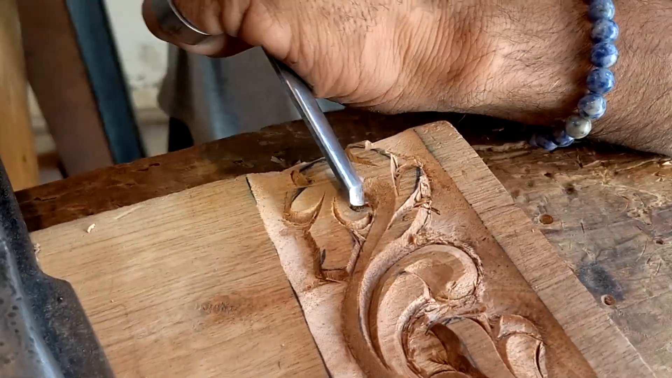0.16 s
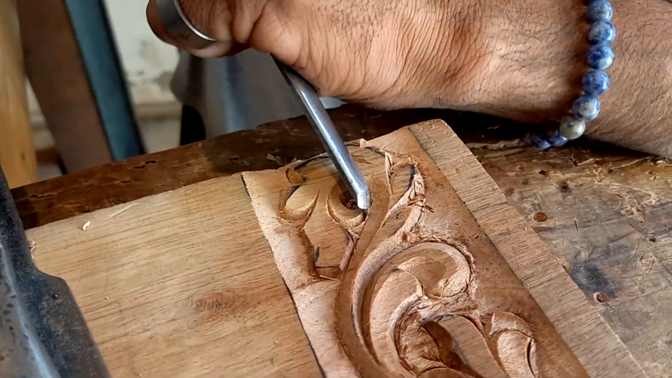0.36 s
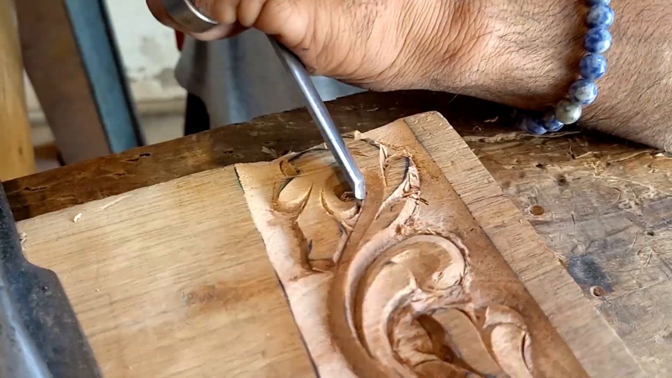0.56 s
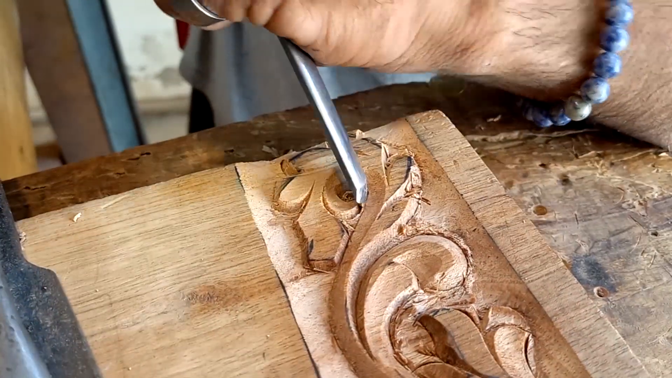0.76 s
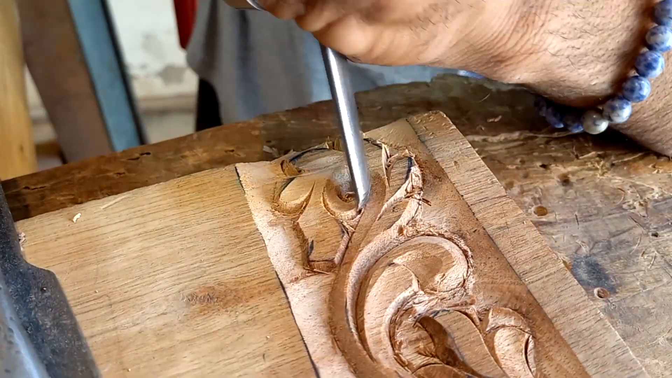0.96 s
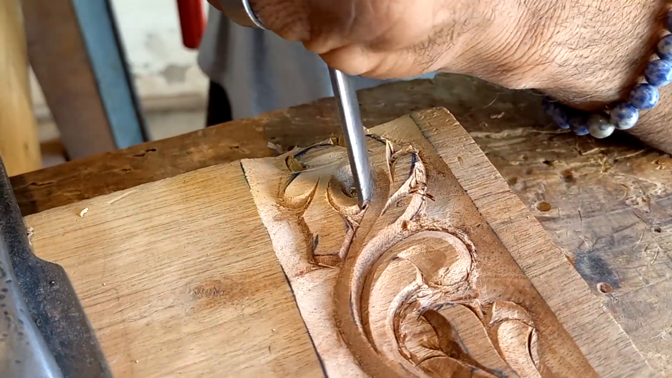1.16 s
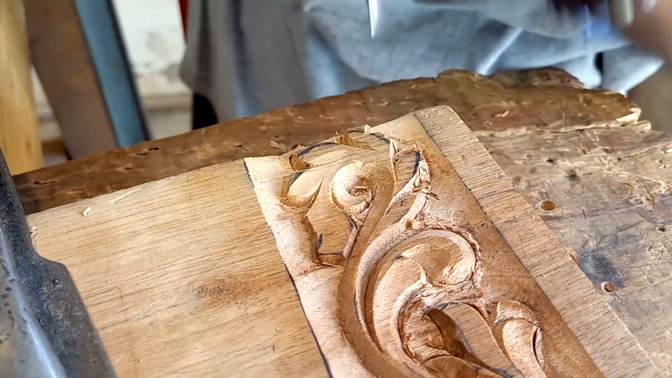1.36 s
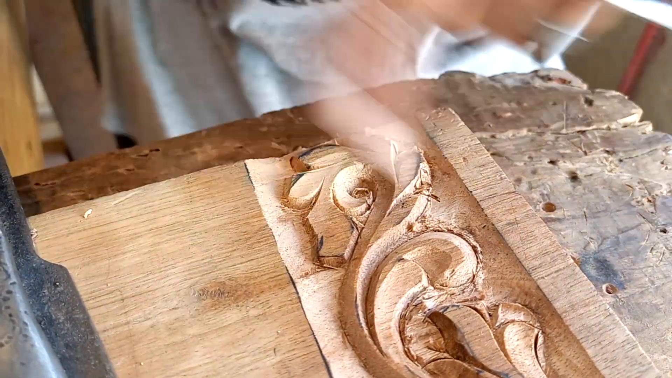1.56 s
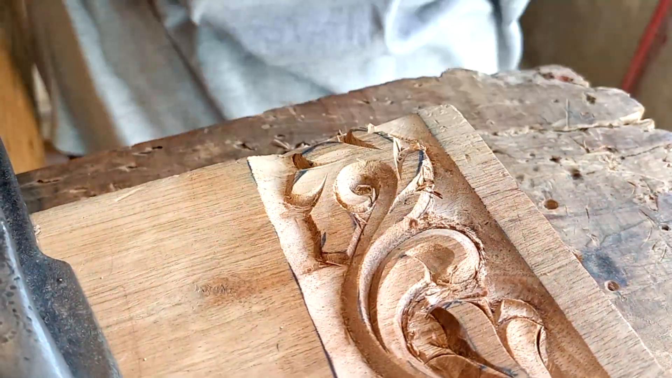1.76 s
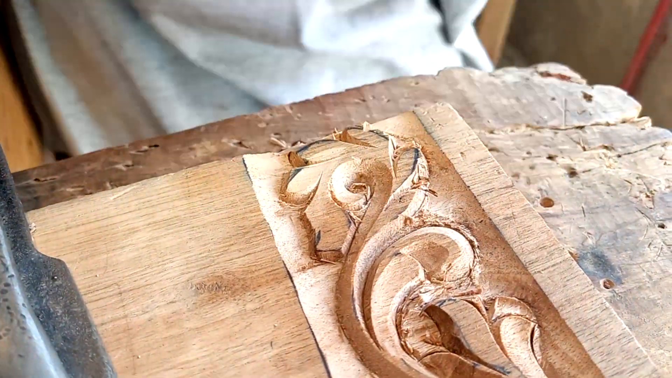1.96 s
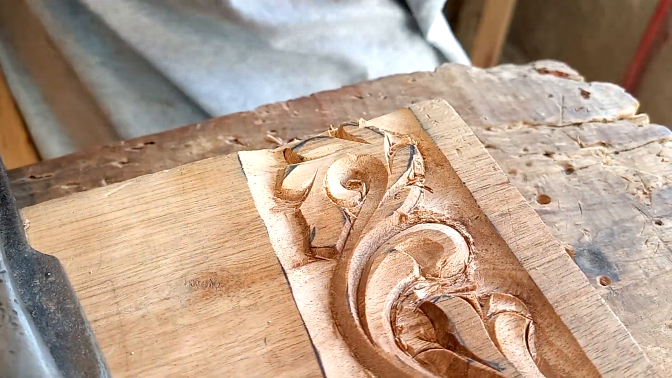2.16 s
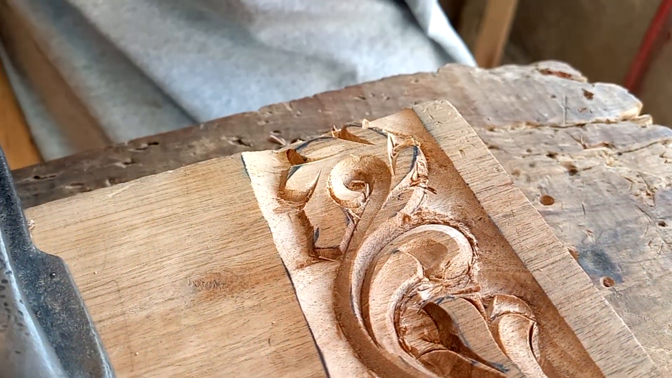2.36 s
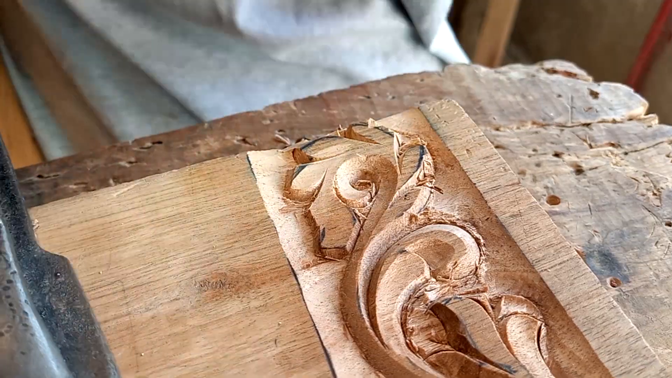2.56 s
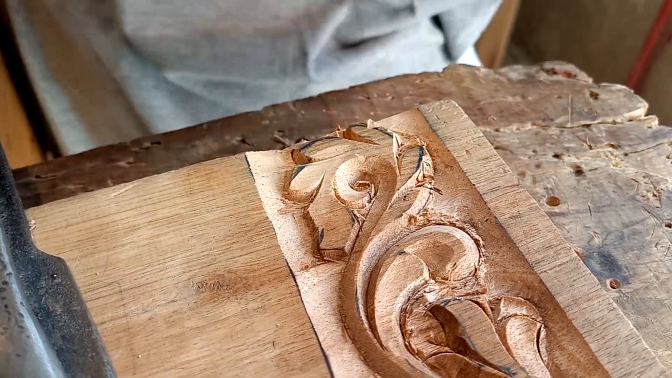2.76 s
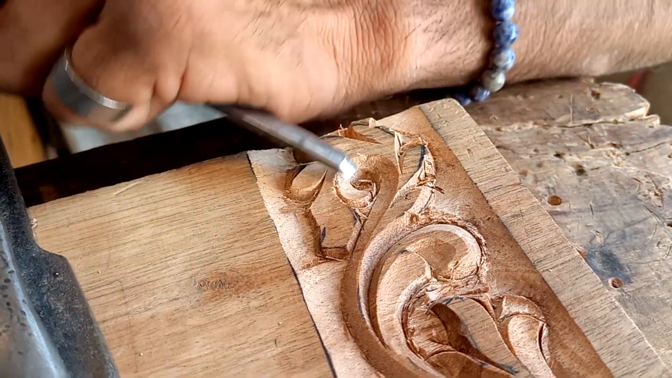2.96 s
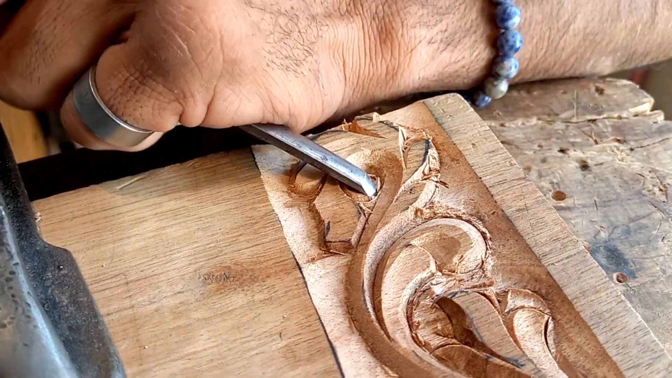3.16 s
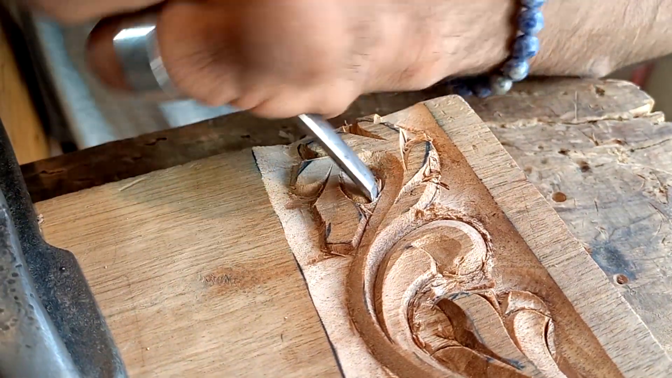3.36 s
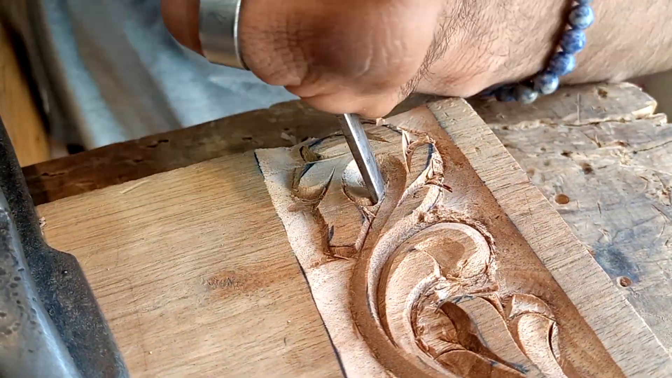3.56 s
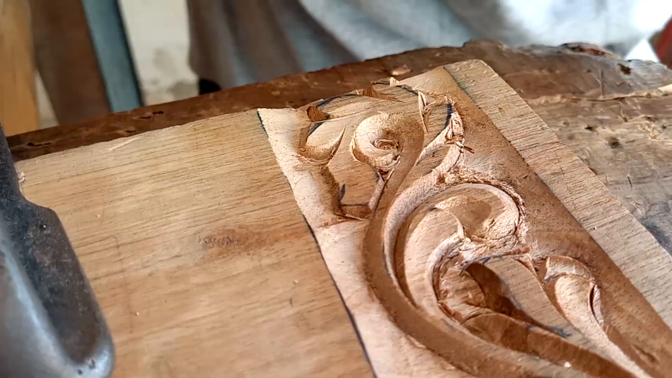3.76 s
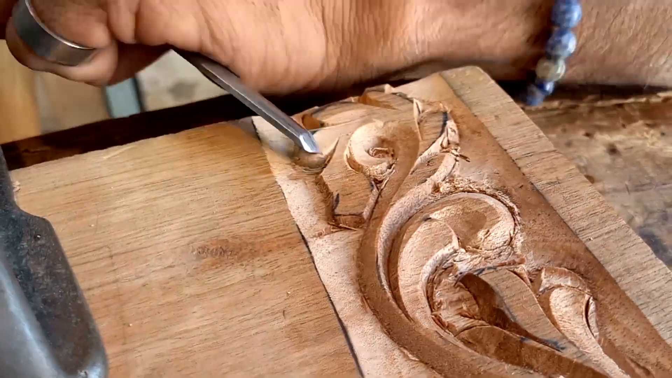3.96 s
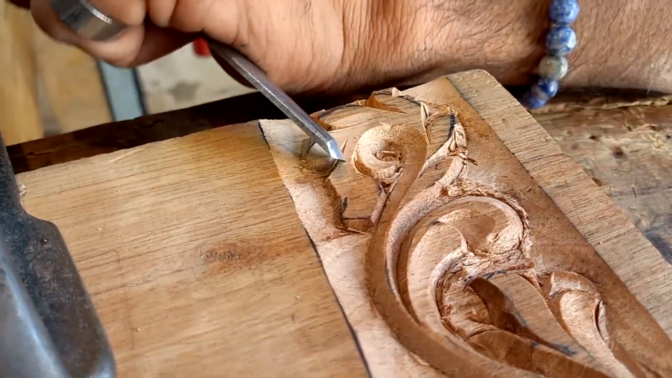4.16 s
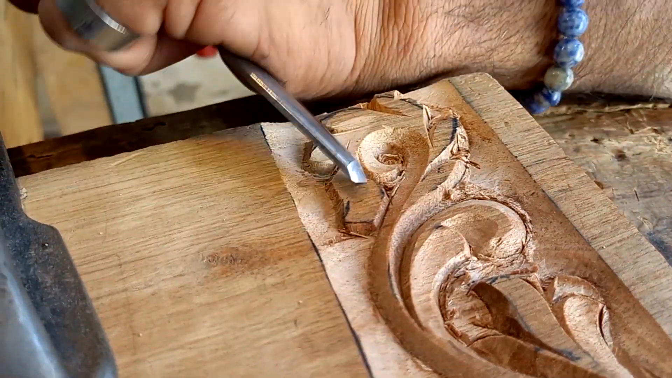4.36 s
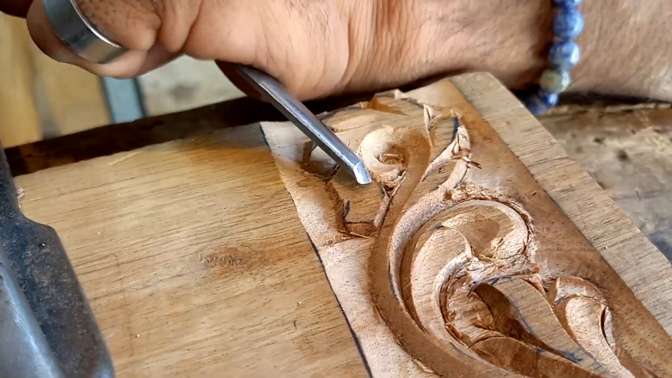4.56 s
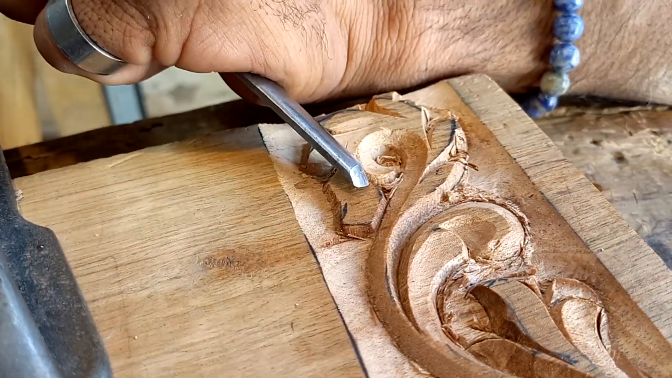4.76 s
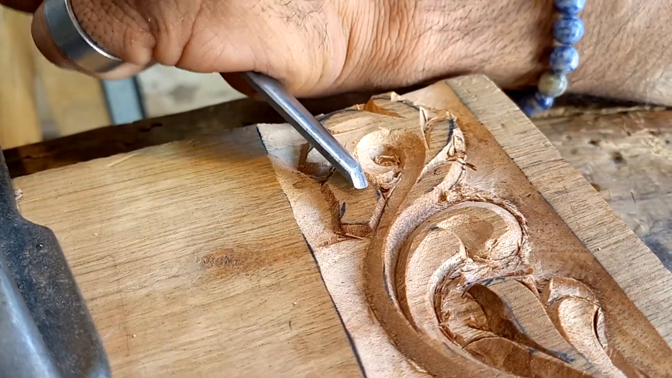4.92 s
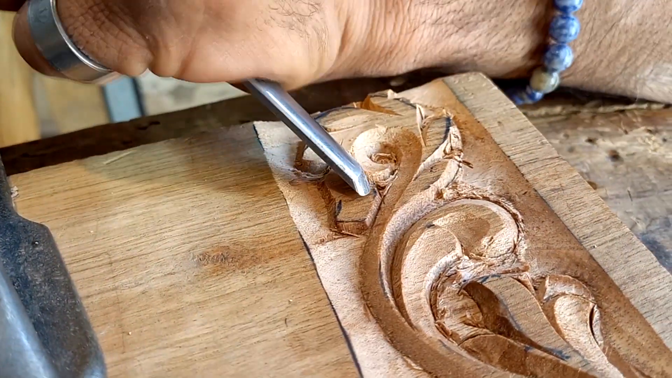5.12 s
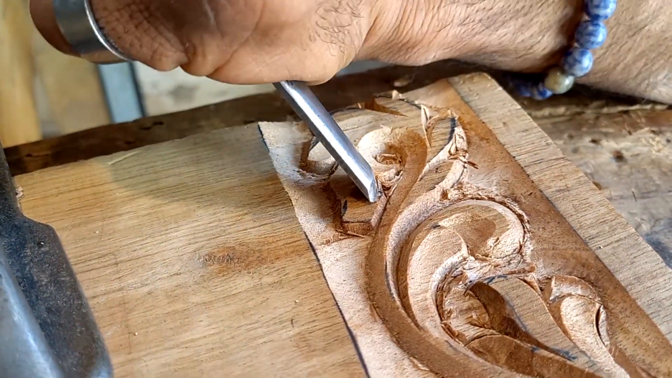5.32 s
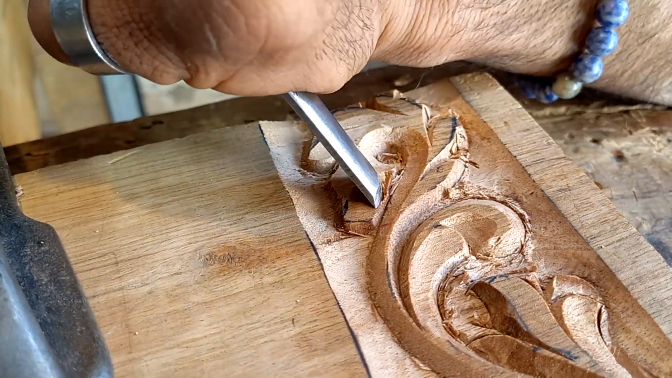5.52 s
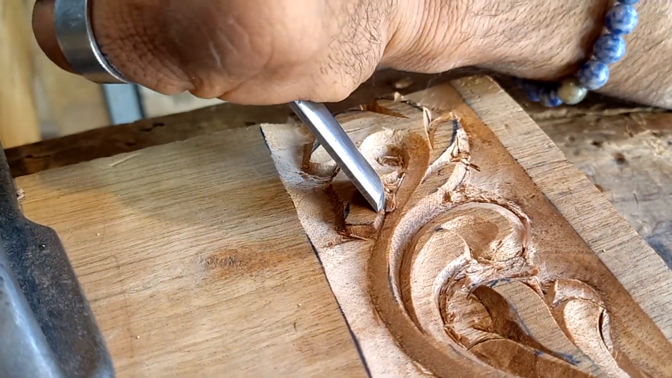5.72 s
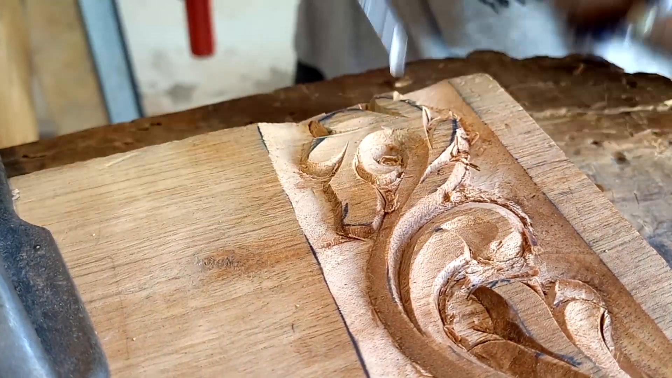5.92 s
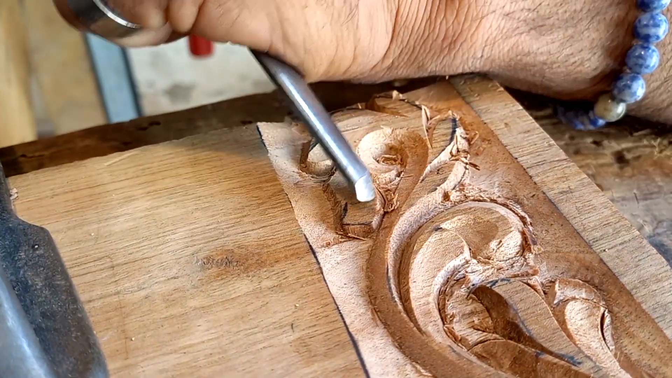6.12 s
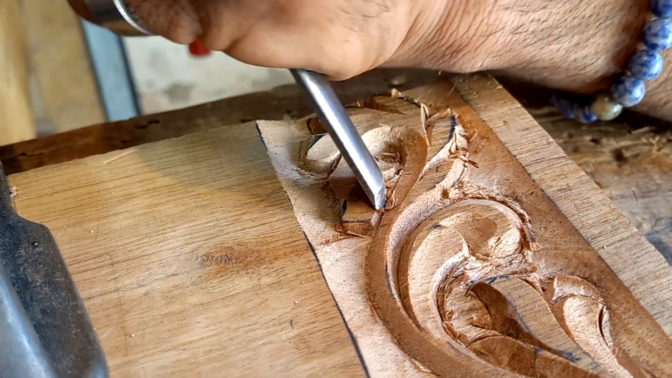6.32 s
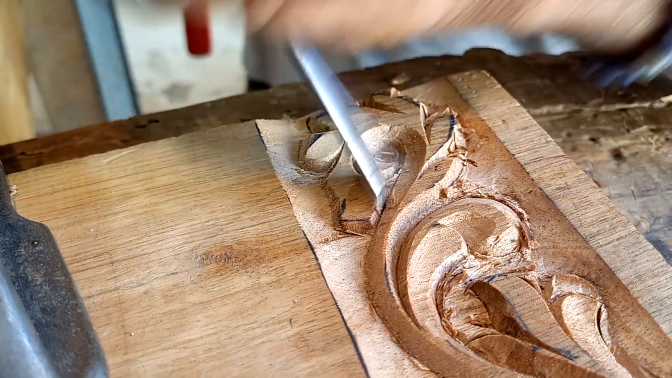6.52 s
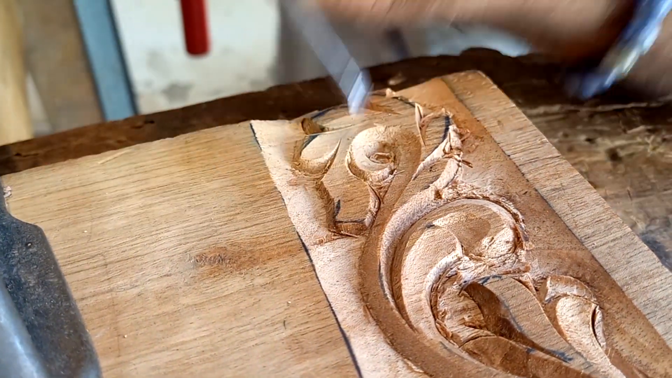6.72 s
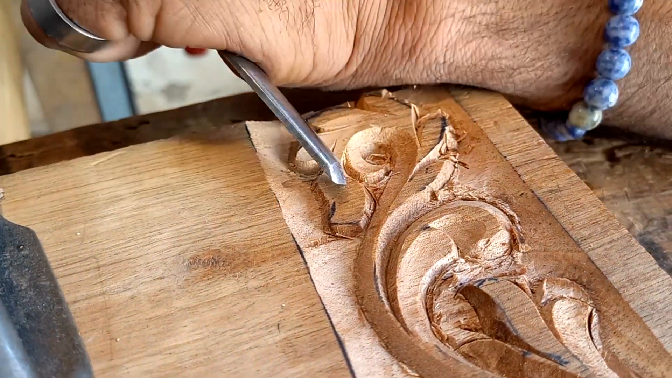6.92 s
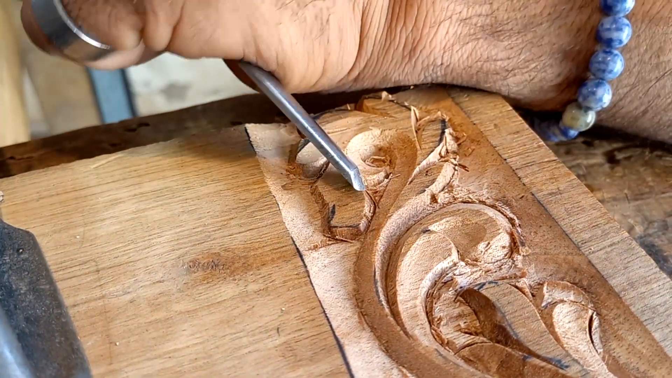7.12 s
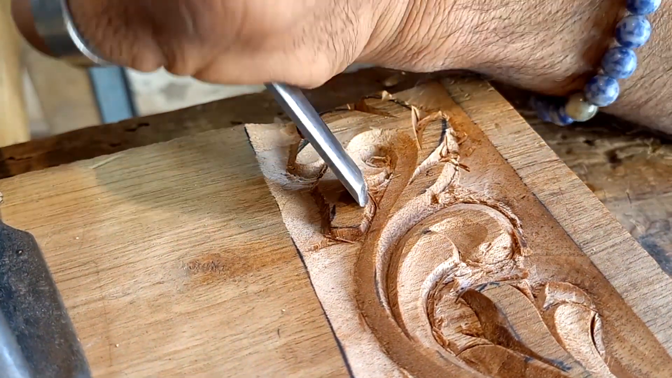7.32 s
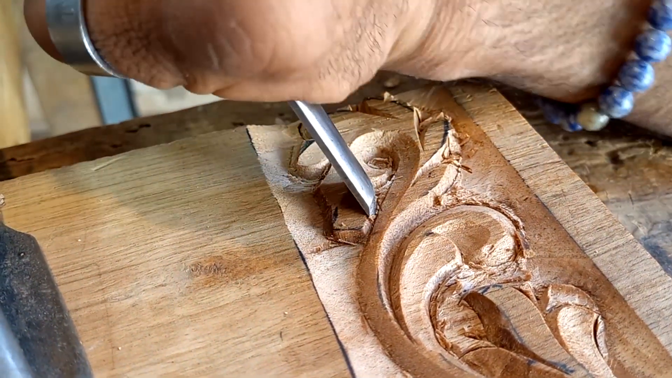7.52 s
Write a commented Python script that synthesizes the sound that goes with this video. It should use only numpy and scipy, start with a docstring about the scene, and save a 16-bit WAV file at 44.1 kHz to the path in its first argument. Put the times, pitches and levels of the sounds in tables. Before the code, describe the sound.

Close stereo microphones catch dry, cracking wood knocks with a thick bench thump swelling just behind each attack. Three come early, then a steel tool clacks down with quick dying bounces and light handling bumps. A pair, a steady run of seven rising in force, and two more pairs follow. Small room, very short reverberation, low drone fading early, quiet hiss of hand and blade brushing wood.

```python
"""A small room with a workbench: a steel gouge is driven into a hardwood panel in five short runs of knocks.
Each knock is a push, ringing modes and noise for the crack, a slower swell of bench and room, and loose steel
set ringing on the bench. A gouge drops and rocks to rest in dying bounces; steel ticks as filtered clicks, and
brushing over the carving is swelling noise. Below lie still-room noise and a far drone of noise and wavering
hum that fades. A fast limiter squashes the attacks."""
import sys
import numpy as np
from scipy import signal
from scipy.fft import rfft, irfft
from scipy.io import wavfile
from scipy.ndimage import uniform_filter1d, minimum_filter1d

SR = 44100
rng = np.random.default_rng(int(sys.argv[2]) if len(sys.argv) > 2 else 0)


def wav_record(signal):
    """Record a signal, one row per channel, as 16-bit PCM in the file named by sys.argv[1]."""
    frames = np.transpose(np.atleast_2d(signal))
    bounded = np.clip(frames, -1, 1)
    # unit amplitude maps onto the largest positive 16-bit level
    quanta = np.round(bounded * 32767).astype(np.int16)
    wavfile.write(sys.argv[1], SR, quanta)


N = 334278
T = np.arange(round(.45 * SR)) / SR  # clock of one blow, seconds

# Knocks on the gouge, the last of each run the heaviest. Each row: start in seconds, force in dB,
# bass weight in dB, treble snap in dB, pitch of the cut in Hz, crack in dB.
KNOCK_ROWS = [(0.8414, -13.5, -0.5, 0, 2880, 10), (0.995, -8, 3.5, -2.5, 3380, 3.5),
              (1.136, -11, 7, 2, 610, -6), (3.4729, -8, 1.5, 0.5, 1460, 6.5), (3.609, -15, 10, 8, 640, 3.5),
              (4.501, -26.5, -3.5, -14, 800, -1), (4.6428, -19, -3, -0.5, 755, 4),
              (4.8162, -15, -4, -6, 740, 7.5), (4.981, -13.5, 0.5, -14, 1500, 12.5),
              (5.1392, -14, -4, -4, 810, 4), (5.2917, -10, 0.5, -8.5, 3120, -3.5),
              (5.4332, -10.5, 4.5, -6, 764, -6), (6.1275, -10, -2, -7, 1410, 1.5),
              (6.258, -9.5, 5.5, -4, 790, -9.5), (7.0755, -15.5, 1, -10, 2930, 3),
              (7.2204, -8, 6, -5, 1421, 10.5)]
# Place of the crack, moving from right to left. Each row: time in seconds, left minus right in dB.
KNOCK_PAN = [(0.8, -2), (4.5, 6), (7.5, 5)]
# Modes of gouge and handle. Each row: pitch in Hz, relative level in dB, time to fall 60 dB in seconds.
# Here and in the bench and steel tables the pitches are those of the early runs.
GOUGE_MODES = [(763, -12, 0.023), (987, -19, .03), (1415, -1.5, 0.025), (1620, 1.5, 0.022),
               (2220, 1, 0.015), (2957, -5.5, 0.025), (4200, -15, 0.0043)]
# Modes of bench top and panel. Each row: pitch in Hz, relative level in dB, time to fall 60 dB in seconds.
BENCH_MODES = [(126.44, -21.5, 0.49), (147, -21.5, .33), (201.8, -12.5, 0.33), (236.4, -21, 0.37),
               (309.4, -21.5, 0.34), (376, -6.5, 0.17), (434.7, -20, 0.22), (457, -8.5, .25),
               (499.7, -10, 0.24), (591, -19.5, 0.15), (714, -15, 0.19), (864, -21, 0.053),
               (1235, -14.5, 0.16), (1542, -20, 0.27), (1860, -27.5, 0.21), (2290, -29.5, 0.24),
               (2340, -30.5, 0.16), (2834, -29, 0.14)]
# Dense splintering crack at the edge. Each row: band in Hz, relative dB per Hz, time to fall 60 dB in seconds.
CRACK_BANDS = [(60.4, -21.5, 0.018), (175, 15, 0.088), (326, -8, 0.013), (820, 22, 0.017),
               (1612, 12.5, 0.038), (3180, 7, 0.031), (3800, 7.5, 0.017), (8000, 3.5, 0.013),
               (15600, -7, 0.015)]
# The room's answer to a blow. Each row: band in Hz, relative dB per Hz, time to fall 60 dB in seconds.
ROOM_BANDS = [(40, -30.5, .5), (81, -42, 0.61), (126, 6, 0.25), (260, 3, 0.29), (414, 9, 0.25),
              (715, 4, 0.22), (1400, -1, 0.21), (3130, -5.5, 0.18), (3960, -13, 0.16), (7200, -22.5, 0.19),
              (15200, -32.5, 0.11)]
# The edge set on the wood or eased out of a cut. Each row: start in seconds, force in dB.
TOUCH_ROWS = [(3.835, -49), (4.15, -52), (4.189, -50.5), (5.712, -52.5), (5.821, -61.5), (5.919, -58.5),
              (6.435, -40), (6.536, -41.5), (6.815, -62)]
# Tools bumped on the bench. Each row: start in seconds, force in dB, bass weight in dB, treble snap in dB,
# pitch of the contact in Hz, ping of the blade in dB.
BUMP_ROWS = [(1.9345, -36.5, -4, 4, 3380, -13), (1.9512, -25, -22, 0, 3870, -29.5),
             (2.241, -48.5, 10, -9.5, 496, -8), (2.3415, -39.5, 4, -40, 714, -13.5),
             (2.895, -44.5, -27, 19, 2880, -11), (2.929, -30, 0.5, -15.5, 900, 2.5)]
# Blade and handle of a landing tool. Each row: pitch in Hz before a common factor of 0.97,
# relative level in dB, time to fall 60 dB in seconds.
BLADE_MODES = [(450.4, -10.5, 0.16), (630, -2, 0.12), (679, -9.5, 0.25), (1099.5, -11, .42),
               (1733, -2.5, 0.052), (2370, -10.5, 0.036), (2910, -13, 0.092), (3713, -12.5, 0.013)]
# Loose steel on the bench. Each row: pitch in Hz, relative level in dB, time to fall 60 dB in seconds.
STEEL_MODES = [(392, -49.5, 0.64), (485, -59, 3.7), (1085, -51.5, 1.2), (1556, -49.5, 3.8)]
# Clear ticks of steel and snaps of wood fibre. Each row: start in seconds, level in dB before
# a common 7 dB lift, centre in Hz.
TICK_ROWS = [(1.531, -33, 4770), (1.85, -39.5, 9970), (2.038, -48.5, 13000), (2.553, -54, 8900),
             (2.655, -47, 9850), (2.818, -41, 5200), (2.894, -46, 11000), (3.171, -60.5, 7000),
             (3.636, -47, 9200), (3.991, -38, 3470), (5.35, -41, 4470), (7.572, -52.5, 5870)]
# Hand and blade brushing over the wood. Each row: peak in seconds, level in dB, rise in seconds, fall in seconds.
BRUSH_ROWS = [(1.57, -53, .15, 0.16), (2.08, -58, 0.1, 0.087), (2.3, -61, 0.07, 0.15),
              (2.326, -46, 0.016, 0.02), (2.68, -66.5, 0.097, .1), (3.833, -54.5, 0.0087, 0.13),
              (6.432, -45.5, 0.012, 0.055), (6.636, -41, 0.046, 0.069), (7.45, -68.5, 0.057, 0.089)]
# Colour of the brushing. Each row: frequency in Hz, relative dB per Hz.
BRUSH_COLOUR = [(100, -15.5), (600, 9.5), (1400, 7), (2800, 19.5), (5000, 11), (9000, 9.5), (15000, 4)]
# Colour of the still room. Each row: frequency in Hz, relative dB per Hz.
QUIET_COLOUR = [(30, -20), (70, -14), (120, 0), (175, -1), (260, -10), (420, -9), (800, -20), (1500, -22),
                (3200, -24), (5000, -31), (8000, -32), (12000, -36), (16000, -47)]
# Colour of the drone's noise. Each row: frequency in Hz, relative dB per Hz.
RUMBLE_COLOUR = [(40, -31), (110, -15.5), (145, -5), (175, -3), (215, -7), (280, -18), (400, -7.5),
                 (600, -19), (1200, -39.5), (3000, -62)]
# Course of the drone. Each row: time in seconds, level in dB, pitch of the hum in Hz before its waver.
DRONE_COURSE = [(0, -67.5, 156.1), (0.399, -65, 158.9), (.8, -56.5, 168.4), (1.251, -62, 153),
                (1.602, -62.5, 157), (1.85, -82.5, 146.9), (2.699, -71.5, 157.2), (3.3, -80.5, 160.1),
                (7.6, -82, 149.7)]
# Lines of the hum. Each row: multiple of its pitch, level against the drone in dB.
HUM_LINES = [(1, 4.5), (1.25, -3.5)]

LATE_S, LATE_PITCH = 3.95, 1 / 1.0722  # blows after this second ring lower by this ratio
TOUCH_WEIGHT_DB, TOUCH_SNAP_DB, TOUCH_HZ, TOUCH_CRACK_DB = 3.5, 5, 1460, -7.5
TOOL_CRACK_DB, TOOL_PAN_DB = -0.5, 2.6  # sharpness and left-right place of the lighter contacts
DROP_S, DROP_DB, DROP_WEIGHT_DB, DROP_SNAP_DB, DROP_HZ, DROP_PING_DB = 1.9625, -7.5, -22.5, -11.5, 2980, -10.5
BOUNCE_GAP_S, BOUNCE_KEEP = .0465, .93  # first gap, and the share of it kept each time
BOUNCE_DB, BOUNCE_LOSS_DB = -20.5, 5.5  # first force, and the loss per bounce
BOUNCE_WEIGHT_DB, BOUNCE_SNAP_DB, BOUNCE_HZ = -2, -20.5, 650
BLADE_LAG_S, BLADE_DB, BLADE_PITCH = .0075, -4, 2  # the blade against the handle: delay, force, pitch ratio
DAMPED_S = 3.83  # a touch stills the loose steel
STEEL_CRACK_SHARE = 0.58  # how much more a sharp knock stirs the loose steel
STEEL_SCATTER_DB = 2
FAINT_PER_S, FAINT_HZ, FAINT_OCTAVES = 2, 7500, 0.23  # chance ticks: rate, middle pitch, spread
FAINT_DB, FAINT_SPREAD_DB = -62.5, 1.5  # before the lift that all ticks share
QUIET_DB = -70.5
EDGE_HZ = 16300  # upper band limit


def knocks():
    """Blows drive the edge into the wood; the last of a run bottoms out and thumps the bench."""
    out = np.zeros((2, N))
    for s, *knock in KNOCK_ROWS:
        pan_db = np.interp(s, *np.transpose(KNOCK_PAN))
        add(out, s, blow(s, *knock, pan_db))
    return out


def blow(s, force_db, weight_db, snap_db, cut_hz, crack_db, pan_db):
    """A short push and crack, then the bench and the room; a heavy blow puts more into the bass."""
    t = T[:3072]
    u = t / 0.00019
    push = amp(11.0 + 0.91 * weight_db) * u * (2 - u) * np.exp(-u)

    # the wood right under the edge
    cut = amp(-8.5) * np.sin(2 * np.pi * cut_hz * t) * np.exp(-np.log(1000) * t / 0.0066)
    gouge = amp(2.0) * ring(GOUGE_MODES, t, pitch_at(s), scatter_db=5)
    crack = pair(gouge + cut) + amp(-3.5) * burst(CRACK_BANDS, size=3072)
    crack = crack * (1 - np.exp(-t / 0.00098)) + pair(push)
    crack = crack * amp(crack_db) * amp([[pan_db / 2], [-pan_db / 2]])

    # the heavy top swings up slowly, the room slower still
    bench = amp(-3.5) * ring(BENCH_MODES, T, pitch_at(s), scatter_db=2.5) * (1 - np.exp(-T / 0.0092))
    room = amp(2) * burst(ROOM_BANDS, size=len(T)) * (1 - np.exp(-T / 0.017))
    sound = (bench + room) * amp([[1], [-1]])  # 2 dB to the left
    add(sound, 0, crack)

    grid = np.arange(0, SR / 2, 230)
    ripple_db = 3 * rng.standard_normal(len(grid)) * np.minimum(grid / 2500, 1)

    def tone(hz):
        """Bass and boom by weight, treble by snap, and the ripple of resonances that each new bite has."""
        bass = 0.71 / (1 + (hz / 600) ** 4) + 0.85 * bump(hz, 360, 0.22)
        treble = 1 / (1 + (3800 / (hz + 1)) ** 3)
        bite_db = 6.6 * bump(hz, cut_hz, 0.41) + np.interp(hz, grid, ripple_db)
        return weight_db * bass + snap_db * treble + bite_db

    return amp(force_db) * colour(sound, tone)


def pitch_at(s):
    """After 3.95 s, gouge and bench ring about 7% lower."""
    return LATE_PITCH if s > LATE_S else 1


def touches():
    """The edge is placed for the next cut, or freed from the last: a tiny knock."""
    out = np.zeros((2, N))
    for s, force_db in TOUCH_ROWS:
        touch = blow(s, force_db, TOUCH_WEIGHT_DB, TOUCH_SNAP_DB, TOUCH_HZ, TOUCH_CRACK_DB, TOOL_PAN_DB)
        add(out, s, touch)
    return out


def dropped_gouge(count=4):
    """One bright landing, then bounces ever sooner and weaker, each on the handle and then on the blade."""
    out, s = np.zeros((2, N)), DROP_S
    contacts = [(s, DROP_DB, DROP_WEIGHT_DB, DROP_SNAP_DB, DROP_HZ)]
    for k in range(count):
        s += BOUNCE_GAP_S * BOUNCE_KEEP ** k
        force_db = BOUNCE_DB - k * BOUNCE_LOSS_DB
        contacts.append((s, force_db, BOUNCE_WEIGHT_DB, BOUNCE_SNAP_DB, BOUNCE_HZ))
    for s, force_db, weight_db, snap_db, hz in contacts:
        handle = landing(s, force_db, weight_db, snap_db, hz, DROP_PING_DB)
        blade = landing(s, force_db + BLADE_DB, weight_db, snap_db, hz * BLADE_PITCH, DROP_PING_DB)
        add(out, s, handle)
        add(out, s + BLADE_LAG_S, blade)
    return out


def bumps():
    """Tools are nudged and lifted on the bench: light landings."""
    out = np.zeros((2, N))
    for row in BUMP_ROWS:
        add(out, row[0], landing(*row))
    return out


def landing(s, force_db, weight_db, snap_db, contact_hz, ping_db):
    """A tool meets the bench: a blow, and a ping of its blade."""
    ping = amp(force_db + ping_db) * pair(ring(BLADE_MODES, T, 0.97), lag_s=.0001)
    return blow(s, force_db, weight_db, snap_db, contact_hz, TOOL_CRACK_DB, TOOL_PAN_DB) + ping


def loose_steel():
    """Each knock tops up the ringing of loose steel, unevenly from mode to mode; a touch stills it once."""
    t, out = np.arange(N) / SR, np.zeros(N)
    s, force_db, *_, crack_db = np.transpose(KNOCK_ROWS)
    for hz, db, t60 in STEEL_MODES:
        scatter_db = STEEL_SCATTER_DB * rng.standard_normal(len(s))
        kicks = np.zeros(N)
        kicks[np.round(s * SR).astype(int)] = amp(force_db + STEEL_CRACK_SHARE * crack_db + scatter_db) ** 2
        for part, pitch in ((t < DAMPED_S, 1), (t >= DAMPED_S, LATE_PITCH)):
            # the energy leaks away and restarts from nothing after the touch
            energy = signal.lfilter([1], [1, -np.exp(-2 * np.log(1000) / (t60 * SR))], kicks[part])
            turns = hz * pitch * t[part] + rng.random()
            # a twin mode 7 Hz higher beats with it
            twin = amp(-18.5) * np.sin(2 * np.pi * (turns + 7 * t[part] + rng.random()))
            out[part] += amp(db) * np.sqrt(energy) * (np.sin(2 * np.pi * turns) + twin)
    touch_fade = np.minimum(abs(t - DAMPED_S) / 0.0081, 1)
    return out * touch_fade * amp([[1], [-1]])


def ticks():
    """Tiny bright clicks with a faint tail: decaying noise held around a centre pitch."""
    out, t = np.zeros((2, N)), T[:8192]
    shape = np.exp(-t / 0.0017) + amp(-10) * np.exp(-t / 0.011)
    grid = np.arange(0, SR / 2, 400)
    for s, db, centre_hz in TICK_ROWS + faint_ticks():
        click = rng.standard_normal((2, len(t))) * shape
        ripple_db = 4 * rng.standard_normal(len(grid))

        def tone(hz):
            """A bell around the centre, roughened by chance."""
            return 22 * (bump(hz, centre_hz, 0.83) - 1) + np.interp(hz, grid, ripple_db)

        add(out, s, amp(db + 7) * colour(click, tone))
    return out


def faint_ticks():
    """Handled tools and wood tick by chance: rows of start in seconds, level in dB, centre in Hz."""
    times = np.flatnonzero(rng.random(N) < FAINT_PER_S / SR) / SR
    rows = []
    for s, (a, b) in zip(times, rng.standard_normal((len(times), 2))):
        rows.append((s, FAINT_DB + FAINT_SPREAD_DB * a, FAINT_HZ * 2 ** (FAINT_OCTAVES * b)))
    return rows


def brushes(grain_db=1.8):
    """Skin and steel rub over the grain: a hiss that catches on the fibres."""
    t, power = np.arange(N) / SR, np.zeros(N)
    for s, db, rise, fall in BRUSH_ROWS:
        power += amp(db) ** 2 * np.exp(-4 * ((t - s) / np.where(t < s, rise, fall)) ** 2)
    fibres = uniform_filter1d(rng.standard_normal(N), size=90)
    catching = amp(grain_db * fibres / fibres.std())
    return hiss(BRUSH_COLOUR, size=N) * np.sqrt(power) * catching


def background(waver_hz=3.5):
    """Still-room noise and a low drone whose wavering hum rises a little, sags and fades."""
    t = np.arange(N) / SR
    s, db, hz = np.transpose(DRONE_COURSE)
    knots = np.arange(0, N / SR, .05)
    waver = np.interp(t, knots, waver_hz * rng.standard_normal(len(knots)))
    turns = np.cumsum(np.interp(t, s, hz) + waver) / SR
    hum = sum(amp(line_db) * np.sin(2 * np.pi * k * turns) for k, line_db in HUM_LINES)
    quiet = amp(QUIET_DB) * hiss(QUIET_COLOUR, size=N)
    drone = amp(np.interp(t, s, db)) * (hiss(RUMBLE_COLOUR, size=N) + hum)
    return quiet + drone


def amp(db):
    """Decibels to gain."""
    return 10 ** (np.asarray(db) / 20)


def read(points, hz):
    """A spectrum joined by straight lines over log frequency."""
    f, value = np.transpose(points)[:2]
    return np.interp(np.log(hz + 1), np.log(f + 1), value)


def add(mix, s, sound):
    """Mixes a stereo sound in at time s, in place."""
    part = mix[:, max(round(s * SR), 0):][:, :sound.shape[1]]
    part += sound[:, :part.shape[1]]


def noise_spectrum(size, apart_hz=750):
    """White noise at two microphones: nearly alike in the bass, unrelated in the treble."""
    hz = np.fft.rfftfreq(size, 1 / SR)
    a, b = rfft(rng.standard_normal((2, size)))
    same = .97 / (1 + (hz / apart_hz) ** 4)
    return hz, np.array([a, same * a + np.sqrt(1 - same ** 2) * b])


def hiss(spectrum, size):
    """Steady coloured stereo noise of rms 1."""
    hz, z = noise_spectrum(size)
    x = irfft(z * amp(read(spectrum, hz)), size)
    return x / x.std()


def burst(bands, size):
    """Stereo noise in which every band dies at its own speed."""
    hz, z = noise_spectrum(size)
    f, _, t60 = np.transpose(bands)
    # overlapping triangles over log frequency share the noise among the bands
    shares = np.array([np.interp(np.log(hz + 1), np.log(f), row) for row in np.eye(len(f))])
    parts = irfft(shares[:, None] * z * amp(read(bands, hz)), size)
    decay = np.exp(-np.log(1000) * T[:size] / t60[:, None, None])
    return (parts * decay).sum(0)


def ring(modes, t, pitch, scatter_db=0):
    """Dying sines set off together, their strengths scattered from blow to blow by scatter_db."""
    hz, db, t60 = np.transpose(modes)[:, :, None]
    db = db + scatter_db * rng.standard_normal(hz.shape)
    sign = (-1) ** np.arange(len(hz))[:, None]  # neighbouring modes swing in opposite senses
    decay = np.exp(-np.log(1000) * t / t60)
    return (sign * amp(db) * decay * np.sin(2 * np.pi * hz * pitch * t)).sum(0)


def colour(x, db_of_hz, size=2048):
    """A causal, minimum-phase filter with the given gain."""
    log_gain = np.log(amp(db_of_hz(abs(np.fft.fftfreq(size, 1 / SR)))))
    taps = np.fft.ifft(np.exp(np.conj(signal.hilbert(log_gain)))).real
    return signal.fftconvolve(x, taps[None], axes=1)[:, :x.shape[1]]


def bump(hz, centre_hz, octaves):
    """A bell over log frequency, of height 1."""
    return np.exp(-(np.log2((hz + 1) / centre_hz) / octaves) ** 2)


def pair(x, lag_s=0.00022):
    """The sound reaches the left microphone first."""
    t = T[:len(x)]
    return np.array([x, np.interp(t - lag_s, t, x, left=0)])


def scene():
    """The workbench, close to a pair of microphones."""
    tools = knocks() + touches() + dropped_gouge() + bumps()
    return tools + loose_steel() + ticks() + brushes() + background()


def record(dry, low_cut_hz=88, recovery_db_per_s=850):
    """A low cut; a fast limiter holds each attack down and lets the thump swell behind it; a band limit."""
    dry = signal.sosfilt(signal.butter(4, low_cut_hz, "high", fs=SR, output="sos"), dry)
    over_db = np.maximum(20 * np.log10(abs(dry).max(0) + 1e-9) + .7, 0)  # excess above -0.7 dB
    # the gain reduction jumps up with a peak and then falls at a steady rate
    fall = np.arange(N) * recovery_db_per_s / SR
    held_db = np.maximum.accumulate(over_db + fall) - fall
    # widened and smoothed, so the gain is already down when the peak comes
    reduction_db = uniform_filter1d(-minimum_filter1d(-held_db, size=61), size=61)
    limited = dry / amp(reduction_db)
    band_limit = signal.firwin(255, EDGE_HZ, window=("kaiser", 9), fs=SR)
    return signal.oaconvolve(limited, band_limit[None], "same")


dry = scene()
out = record(dry)
wav_record(out)
```